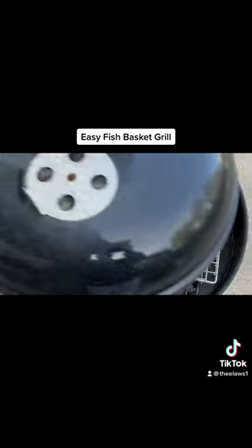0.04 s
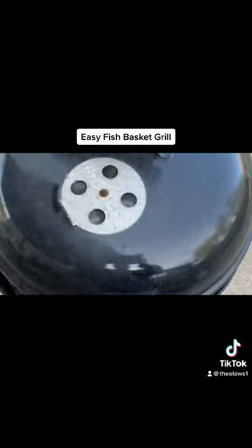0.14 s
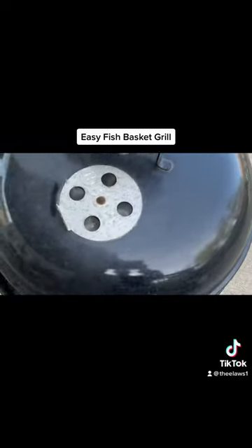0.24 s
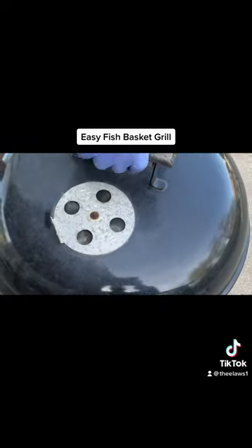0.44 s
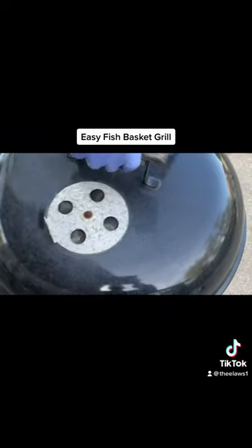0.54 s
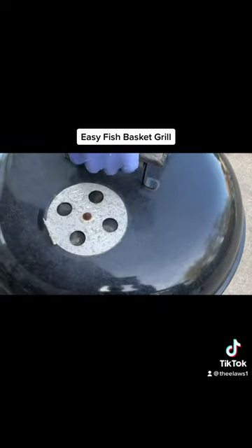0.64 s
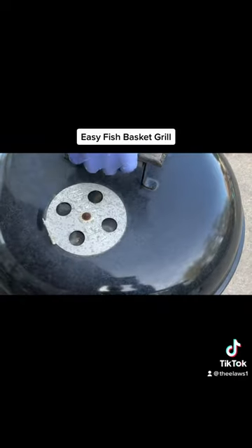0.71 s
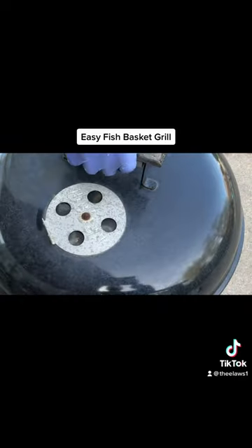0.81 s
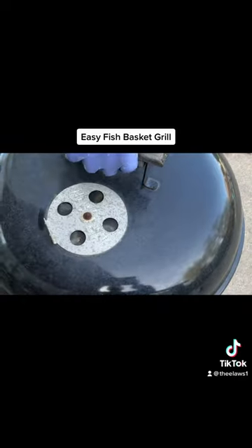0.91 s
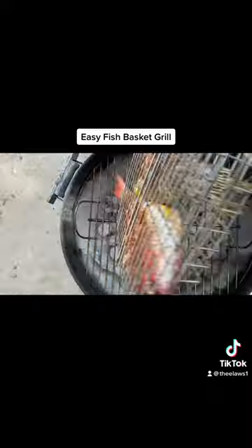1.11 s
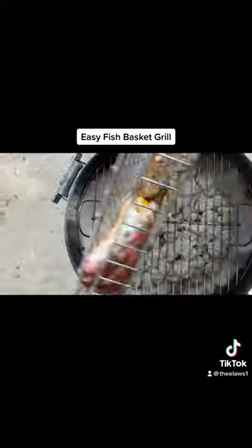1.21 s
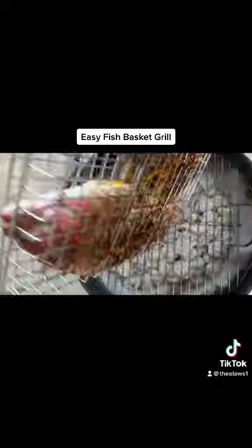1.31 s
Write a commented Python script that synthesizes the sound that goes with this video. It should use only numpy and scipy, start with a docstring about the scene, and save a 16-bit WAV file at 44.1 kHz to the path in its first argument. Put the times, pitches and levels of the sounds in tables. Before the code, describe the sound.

A steel lid scrapes, squeals briefly and clanks as it settles onto a kettle grill. A glove rubs off the handle, then the hot grill hisses faintly with a few ticks, heard close up outdoors.

```python
"""A light scrape and a knock: a steel lid is set down on a kettle grill outdoors.
It rasps and squeals along the rim as it sticks and slips, then clanks home and settles.
Each knock is a falling thud, a bright clash and the ring of lid and bowl. A glove slides off the
handle, and the hiss of the hot grill comes up, with a few ticks, over a low outdoor rumble."""
import sys
import numpy as np
from scipy import signal
from scipy.fft import rfft, irfft
from scipy.io import wavfile

SR = 44100
rng = np.random.default_rng(int(sys.argv[2]) if len(sys.argv) > 2 else 0)


def store_pcm(level_fs):
    """Save levels as 16-bit WAV."""
    pcm = np.round(np.clip(level_fs, -1, 1) * 32767).astype(np.int16)
    wavfile.write(sys.argv[1], SR, np.atleast_2d(pcm).T)


N = 59535
T = np.arange(N) / SR
RING_T = T[:SR // 2]

# The lid hits the bowl. Each row: start in seconds, thud level in dB, thud starting pitch in Hz, pitch
# fall time in seconds, clash level in dB, brightness in dB per octave, lid and bowl ring levels in dB.
LID_KNOCKS = [(0.2048, -12.5, 950, .0021, -29.5, 2, -26, -76),
              (0.3225, -31, 500, 0.0014, -40.5, -3, -48, -86),
              (0.3796, -31, 358, 0.0027, -29.5, 3, -45.5, -68),
              (0.4263, -18, 448, 0.0019, -14.5, -2.4, -39.5, -31),
              (0.54, -20.5, 560, 0.00237, -25.5, 5, -37, -44),
              (0.5760, -18, 1175, 0.00165, -32, -2, -49, -61),
              (0.642, -56, 300, 0.0024, -32.5, 6, -57, -63)]
# Rim slides on rim. Each row: peak, rise and fall times in seconds, rasp level in dB, brightness in
# dB per octave, then the levels of lid groan, bowl groan and shudder in dB.
RIM_SCRAPES = [(0.108, 0.0028, 0.018, -48, 2.5, -85, -78, -63.5),
               (0.137, 0.0016, 0.028, -47.5, 6, -70, -91, -70),
               (0.205, 0.013, 0.02, -41, 0, -35, -52, -43.5),
               (0.328, 0.015, .012, -56.5, -1.5, -65, -63, -40),
               (0.37, 0.0051, 0.0076, -39, 1, -52, -68, -38.5),
               (0.383, 0.015, 0.022, -32.5, -2.1, -39.5, -69, -34),
               (0.428, .014, 0.015, -24.5, -5, -46, -29.5, -31.5),
               (0.443, 0.006, .016, -31.5, -3, -49, -42, -37),
               (0.514, 0.015, 0.031, -43, 1.5, -45, -76, -40),
               (0.538, 0.0095, 0.016, -33.5, 4.5, -36, -55, -28.5),
               (0.573, 0.0078, 0.0048, -42.5, 0, -33.5, -65, -34.5),
               (0.591, 0.014, 0.019, -42, 5.5, -38, -53, -42),
               (0.645, 0.014, 0.015, -49, 1, -66, -56.5, -55),
               (0.686, 0.0029, 0.037, -45, 8.5, -55, -56.5, -61),
               (0.765, 0.012, 0.023, -59.5, 4, -67, -65, -59),
               (0.878, 0.012, .022, -49, 3, -55.5, -75, -50)]
# The rim catches. Each row: peak, rise and fall times in seconds, pitch in Hz, level in dB.
RIM_SQUEALS = [(0.198, 0.0068, 0.024, 720, -38), (0.393, 0.028, 0.012, 590, -38),
               (0.431, 0.01, 0.0065, 748, -30), (0.543, 0.0045, .012, 550, -25.5),
               (0.588, 0.019, 0.013, 810, -37)]
# Small ticks. Each row: start in seconds, level in dB, brightness in dB per octave, fade time in seconds.
SMALL_TICKS = [(1.044, -41, 0.5, 0.0081), (1.096, -39.5, -3, 0.0038), (1.2407, -36, -2, 0.0057)]
# The tones a part rings with. Each row: pitch in Hz, relative level in dB, seconds to fade by 60 dB.
LID_TONES = [(503.7, -6.5, 0.35), (552, 3, 0.21), (585, -1, .25), (638, -8, 0.19), (746.7, -1, .13),
             (808, -13, 0.29), (916, -17.5, 0.31), (944, -22, .2), (1182, -19.5, 0.26), (1650, -35, .12),
             (2040, -23.5, 0.55), (2354, -12, 0.1), (2795, -14, 0.16), (6280, -19.5, 0.17)]
BOWL_TONES = [(494.3, -6.5, 0.26), (743, 11, 0.073), (846, -7, 0.29), (986.4, -6, 0.23), (1230, 1.5, 0.11),
              (1617.6, 1.5, 0.34), (1855, -2, .12), (1893, -3.5, 0.29), (2375, -8, 0.15), (2525, -5, 0.14),
              (2620, 9, 0.075), (3420, -24, 0.12), (3345, -3.5, 0.11), (4877, 4.5, 0.096)]
RIM_TONES = [(1677, -23, 0.1), (1919, -4, 0.12), (2350, -7, 0.035), (2587, -4.5, 0.032), (2720, -4, 0.053),
             (2830, -1.5, 0.079), (3920, -6, 0.071), (3184, -10, 0.046), (3623, 0, 0.069),
             (4320, 3.5, 0.027), (4720, -3.5, 0.043), (4794, 2.5, 0.026), (5200, 2.5, 0.053),
             (6420, 3, 0.06), (6720, 2, 0.01), (7140, -3, 0.038)]
ROCKING_TONES = [(131.3, -12, 0.057), (180, -5.5, 0.052), (227.2, -0.5, 0.065), (269, -7, 0.032)]  # the whole kettle rocking
# The tone colour of each noise, from bass to treble. Each row: frequency in Hz, relative level in dB.
CLASH_COLOUR = [(100, -31), (350, -3), (600, -7), (1000, 0.5), (1500, -2), (2700, -1.5), (4000, -4.5),
                (6700, 0), (9500, -15.5), (16000, -18)]
RASP_COLOUR = [(100, -48), (500, -10), (1200, -9.5), (2700, 1), (3900, -5), (6700, -3), (8500, -6),
               (10000, -16), (16000, -20)]
TICK_COLOUR = [(100, -6), (500, 3), (1500, -1.5), (4000, -0.5), (8000, -4), (16000, -9)]
GLOVE_COLOUR = [(200, -34), (700, -8.5), (1200, 1.5), (1800, 1.5), (3000, -6), (4500, -1), (8000, -12),
                (16000, -39)]
HISS_COLOUR = [(60, 12.5), (170, 14.5), (350, -4.5), (1200, -1), (3500, -1.5), (6500, -3.5), (8400, 1),
               (10000, -6.5), (16000, -6.5)]
RUMBLE_COLOUR = [(20, -22), (45, 2.5), (80, 3), (130, 4.5), (220, -11.5), (400, -15.5), (1000, -14),
                 (2500, -23.5), (8000, -22.5), (16000, -85)]
# How loud the grill hisses over time. Each row: time in seconds, level in dB.
HISS_CURVE = [(0, -53.5), (.1, -58.5), (.2, -64), (.3, -69), (.6, -60), (.75, -58.5), (.82, -69),
              (.95, -59.5), (1.09, -56.5), (1.115, -47), (1.15, -46), (1.22, -48.5), (1.28, -47),
              (1.35, -43.5)]

THUD_END_HZ, THUD_RISE_S, THUD_FADE_S = 203.7, 0.00066, 0.0097
CLASH_RISE_S, CRACK_S, TAIL_DB, TAIL_RING_S = 0.00036, 0.0026, -7.5, 0.094
SLIPS_PER_S, FRICTION_DB, RIM_DB = 5000, -1, -1.5
RIM_SHIFT, WAVER_DEPTH, WAVER_HZ = 0.008, 0.022, 89  # shift and depth are shares of the pitch
SEATED_S, DAMPING_DB_PER_S = 0.5, 323
RUB_DB, SQUEAK_DB, SQUEAK_HZ, SQUEAK_RING_S = -43.5, -40, 2243, 0.014
POPS_DB, RUMBLE_DB = -6.5, -53
LOW_CUT_HZ, HIGH_CUT_HZ, DIP_DB = 121, 15900, -24


def knock(start, thud_db, top_hz, sweep_s, clash_db, bright_db, lid_db, bowl_db):
    """The lid hits the bowl: a thud, a clash of many crowded tones, and a few that ring on."""
    # High waves travel through the steel faster than low ones, so the thud falls in pitch.
    hz = THUD_END_HZ + (top_hz - THUD_END_HZ) * np.exp(-T / sweep_s)
    thud_shape = (1 - np.exp(-T / THUD_RISE_S)) * np.exp(-(T / THUD_FADE_S) ** 2)
    thud = -np.sin(2 * np.pi * np.cumsum(hz) / SR) * thud_shape
    clash_fade = np.exp(-T / CRACK_S) + amp(TAIL_DB - 60 * T / TAIL_RING_S)
    clash = noise(CLASH_COLOUR, bright_db) * (1 - np.exp(-T / CLASH_RISE_S)) * clash_fade
    out = np.zeros(N)
    add(out, start, amp(thud_db) * thud + amp(clash_db) * clash)
    add(out, start, amp(lid_db) * ring(LID_TONES) + amp(bowl_db) * ring(BOWL_TONES))
    return out * seated_fade(start)


def seated_fade(start):
    """Once the lid lies on the bowl, each stops the other's ringing sooner."""
    return amp(-DAMPING_DB_PER_S * np.maximum(T - max(start, SEATED_S), 0))


def scrape(peak, rise, fall, rasp_db, bright_db, lid_db, bowl_db, shudder_db):
    """Tiny slips rasp in the rim, set lid and bowl groaning and shake the kettle."""
    slips = normalise(clicks(SLIPS_PER_S, spread_db=3))
    stroke = swell(peak, rise, fall)
    friction = colour(slips, RASP_COLOUR, bright_db)
    # The rim's tones shift a little with the point of contact.
    rim = [(hz * (1 + RIM_SHIFT * rng.uniform(-1.02, 1)), db, ring_s) for hz, db, ring_s in RIM_TONES]
    rasp = amp(FRICTION_DB) * friction + amp(RIM_DB) * normalise(resonate(friction, rim))
    push = slips * stroke
    groan = amp(lid_db) * resonate(push, LID_TONES) + amp(bowl_db) * resonate(push, BOWL_TONES)
    rocking = resonate(slips, ROCKING_TONES)
    shudder = np.sqrt(2) * np.cos(np.angle(signal.hilbert(rocking)))  # the rocking at an even level
    return (amp(rasp_db) * rasp + amp(shudder_db) * shudder) * stroke + groan * seated_fade(peak)


def squeal(peak, rise, fall, hz, db):
    """The rim sticks and slips at a regular pace, making a short, slightly unsteady note."""
    smoothing = signal.butter(2, WAVER_HZ, fs=SR, output="sos")
    waver = normalise(signal.sosfilt(smoothing, rng.standard_normal(N)))
    pitch = hz * (1 + WAVER_DEPTH * waver)
    note = normalise(np.sin(2 * np.pi * np.cumsum(pitch) / SR))
    return amp(db) * note * swell(peak, rise, fall)


def tick(db, bright_db, fade_s):
    """A tiny burst of noise that dies away at once."""
    return amp(db) * noise(TICK_COLOUR, bright_db) * np.exp(-T / fade_s)


def glove():
    """A short rub with a fuzzy squeak as the glove leaves the handle."""
    rub = colour(clicks(SLIPS_PER_S, spread_db=2), GLOVE_COLOUR)
    rub *= swell(peak=0.98, rise=0.021, fall=0.046)
    squeak = normalise(resonate(rng.standard_normal(N), [(SQUEAK_HZ, 0, SQUEAK_RING_S)]))
    squeak *= swell(peak=0.975, rise=0.01, fall=0.01)
    return amp(RUB_DB) * rub + amp(SQUEAK_DB) * squeak


def grill_hiss():
    """The hot grill hisses, with a fine crackle of tiny pops."""
    rush = rng.standard_normal(N)
    pops = normalise(clicks(per_second=3500, spread_db=4))
    level_db = np.interp(T, *np.transpose(HISS_CURVE))
    return amp(level_db) * colour(rush + amp(POPS_DB) * pops, HISS_COLOUR)


def outdoor_rumble():
    """A low, steady noise behind everything."""
    return amp(RUMBLE_DB) * noise(RUMBLE_COLOUR)


def amp(db):
    """Turns decibels into a number to multiply a sound by."""
    return 10 ** (np.asarray(db) / 20)


def normalise(x):
    """Scales a sound to an average (rms) level of 1."""
    return x / np.sqrt(np.mean(x ** 2) + 1e-20)


def add(mix, start, sound):
    """Mixes a sound in at a start time in seconds."""
    part = mix[round(start * SR):][:len(sound)]
    part += sound[:len(part)]


def colour(x, points, bright_db=0):
    """Gives noise a tone colour, brightened by bright_db per octave, at an average level of 1."""
    hz = np.fft.rfftfreq(len(x), 1 / SR) + 1
    point_hz, point_db = np.transpose(points)
    shape_db = np.interp(np.log(hz), np.log(point_hz), point_db)
    tilt_db = bright_db * np.log2(np.maximum(hz, point_hz[1]))
    return normalise(irfft(rfft(x) * amp(shape_db + tilt_db), len(x)))


def noise(points, bright_db=0):
    """Steady noise with a tone colour."""
    return colour(rng.standard_normal(N), points, bright_db)


def clicks(per_second, spread_db):
    """Random clicks of uneven size."""
    signs = rng.choice([-1., 1.], N)
    sizes = amp(spread_db * np.minimum(rng.exponential(1, N), 4))
    return signs * sizes * (rng.random(N) < per_second / SR)


def ring(tones):
    """The fading tones an object gives off after one tap."""
    return sum(amp(db - 60 * RING_T / ring_s) * np.sin(2 * np.pi * (hz * RING_T + rng.random()))
               for hz, db, ring_s in tones)


def resonate(force, tones):
    """Shakes an object with a force, so that its own tones stand out."""
    body = ring(tones)
    return signal.fftconvolve(force, body / np.linalg.norm(body))[:N]


def swell(peak, rise, fall):
    """A smooth rise and fall around a peak, all in seconds."""
    return np.exp(-((T - peak) / np.where(T < peak, rise, fall)) ** 2)


def scene():
    """All the sounds, close to one microphone in the open air."""
    out = grill_hiss() + outdoor_rumble() + glove()
    out += sum(scrape(*row) for row in RIM_SCRAPES)
    out += sum(knock(*row) for row in LID_KNOCKS)
    out += sum(squeal(*row) for row in RIM_SQUEALS)
    for start, db, bright_db, fade_s in SMALL_TICKS:
        add(out, start, tick(db, bright_db, fade_s))
    return out[None]


def record(dry):
    """The microphone loses deep bass and the highest treble is cut; separately, the whole scene's level dips
    briefly once."""
    bass_cut = signal.butter(2, LOW_CUT_HZ, "highpass", fs=SR, output="sos")
    dip = amp(DIP_DB * swell(peak=1.1275, rise=0.0028, fall=0.0028))
    treble_cut = signal.firwin(511, HIGH_CUT_HZ, window=("kaiser", 9), fs=SR)
    return signal.oaconvolve(signal.sosfilt(bass_cut, dry) * dip, treble_cut[None], "same")


dry = scene()
out = record(dry)
store_pcm(out)
```